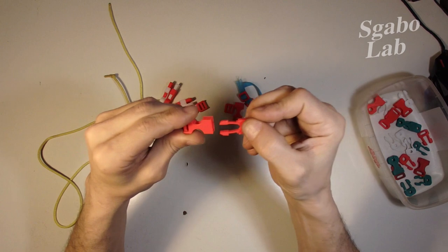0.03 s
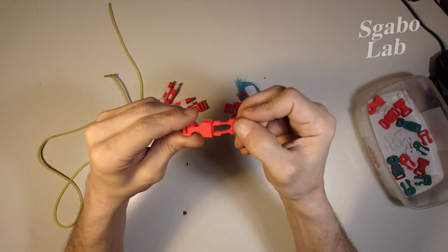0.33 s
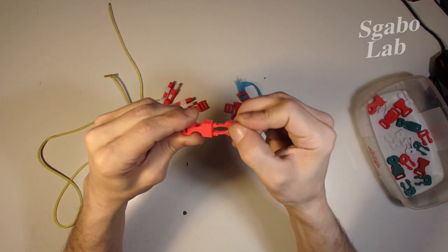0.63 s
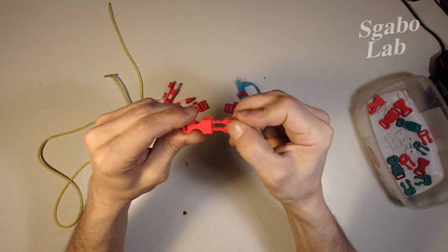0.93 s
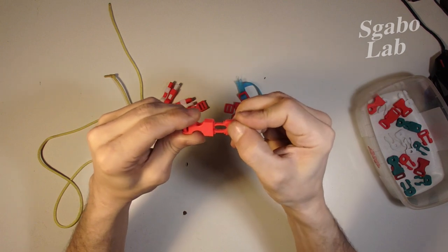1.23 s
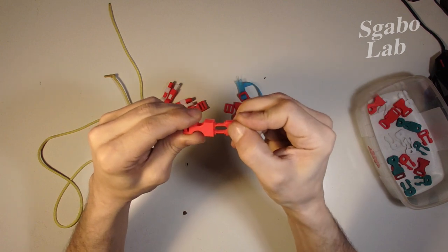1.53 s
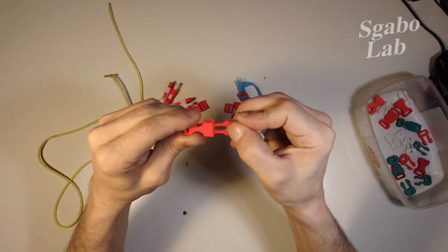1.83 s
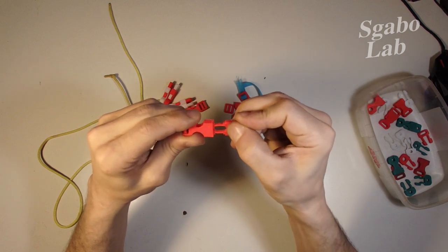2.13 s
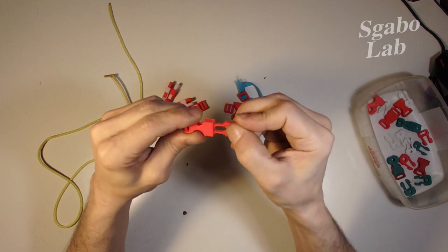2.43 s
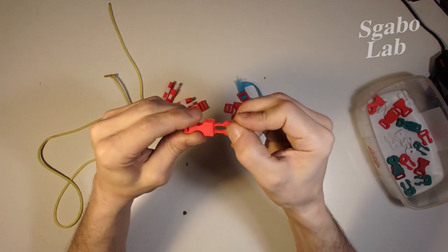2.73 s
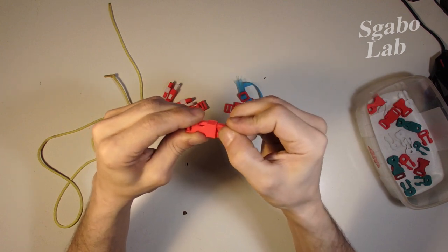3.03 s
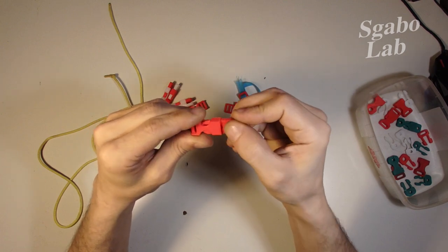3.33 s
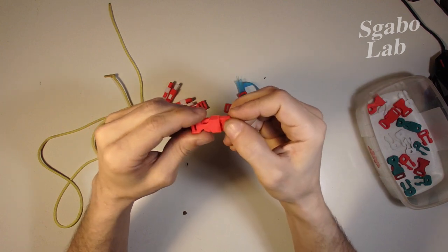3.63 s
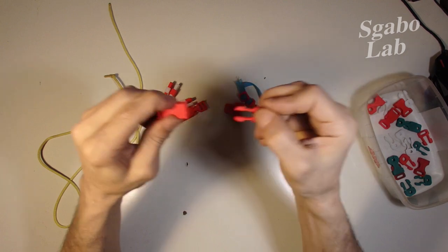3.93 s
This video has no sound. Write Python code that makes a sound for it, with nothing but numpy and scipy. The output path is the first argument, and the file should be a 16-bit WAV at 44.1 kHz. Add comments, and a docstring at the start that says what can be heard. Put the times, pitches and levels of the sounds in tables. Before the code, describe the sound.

A small plastic buckle is handled close by, giving a few light ticks between 0.3 and 0.7 seconds. At about 3 seconds the halves slide briefly and lock with one sharp snap and a hollow thump. Near 3.9 seconds come a quick cluster of ticks and a short scrape. A quiet fan with a faint high whine runs throughout in the small room, dipping just after the snap.

```python
"""A fan hums in a small room; a faint, fuzzy whine near 2.9 kHz runs throughout. Two halves of a small
plastic buckle are fitted together over a table: first come light ticks, impacts that ring body, shell
and prongs. Near 3 s the halves slide and the prongs lock with one sharp snap and a hollow thump; the
gain control ducks, then recovers. Last, the fingers shift with more ticks and a short friction scrape.
A dull copy runs just ahead of each click and scrape, and the room reverberates after it."""
import sys
import numpy as np
from scipy import signal
from scipy.fft import rfft, irfft, next_fast_len
from scipy.io import wavfile
from scipy.ndimage import uniform_filter1d, minimum_filter1d, map_coordinates

SR = 44100
rng = np.random.default_rng(int(sys.argv[2]) if len(sys.argv) > 2 else 0)


def wrap_up_sound(samples):
    """Save the sound to the file named by the first command line argument, as 16-bit audio."""
    columns = np.atleast_2d(samples).T
    # keep every value between -1 and 1, then stretch to whole-number steps
    tamed = np.clip(columns, -1, 1)
    steps = np.round(tamed * 32767).astype(np.int16)
    wavfile.write(sys.argv[1], SR, steps)


N = 176400


def amp(db):
    """Amplitude ratio of a level in decibels."""
    return 10 ** (np.asarray(db) / 20)


def unit(x):
    """Normalisation to an rms of 1."""
    return x / np.sqrt(np.mean(x ** 2) + 1e-20)


def along(points, hz):
    """Interpolation of (Hz, value) points on a logarithmic frequency axis."""
    f, v = np.transpose(points)
    return np.interp(np.log(hz + 1), np.log(f + 1), v)


def wobble(rate):
    """Random modulation: a smooth curve with rate knots a second."""
    knots = rng.standard_normal(int(N * rate / SR) + 4)
    return map_coordinates(knots, [np.arange(N) * rate / SR])


def filtered(x, response):
    """Linear filtering: the spectrum of x times a complex frequency response."""
    size = next_fast_len(N + SR // 2)
    return irfft(rfft(x, size) * response(np.fft.rfftfreq(size, 1 / SR)), size)[..., :N]


def stereo(mid, side):
    """Sum and difference of mid and side give left and right."""
    return np.array([mid + side, mid - side])


def impulse_response(resonances, pitch_ratio=1):
    """Minimum-phase ring of a resonance curve shifted by pitch_ratio, with unit energy."""
    hz = np.fft.rfftfreq(4096, 1 / SR)
    cepstrum = irfft(np.log(amp(along(resonances, hz / pitch_ratio))))
    half = len(cepstrum) // 2
    causal = np.concatenate([cepstrum[:1], 2 * cepstrum[1:half], np.zeros(half)])
    ring = irfft(np.exp(rfft(causal)))
    return ring / np.linalg.norm(ring)


# Spectrum of the fan's air noise. Each row: frequency in Hz, relative spectral density in dB.
AIR_SPECTRUM = [(20, -7), (60, -8), (110, -4.5), (190, 0), (250, -1.5), (380, 1), (540, -5.5), (720, -1),
                (1000, -4), (1250, -2.5), (1360, -10.5), (1480, -6.5), (1750, -9.5), (2100, -7.5),
                (2600, -9.5), (3100, -9), (3350, -11), (4400, -9.5), (4880, -4.5), (5400, -14),
                (6400, -14.5), (7500, -21), (9000, -24.5), (11800, -22), (13700, -22), (15000, -37)]
# Stereo width of that noise. Each row: frequency in Hz, side over mid in dB.
AIR_WIDTH = [(40, -1), (150, -4.5), (400, -8), (1200, -8), (1800, -11), (2600, -4), (3000, -7), (3800, 3.5),
             (5000, 0), (14000, -1)]
# Tones of the fan. Each row: frequency in Hz, level in dB.
FAN_TONES = [(287, -69), (360, -73.5), (453, -67.5), (703, -72.5)]

def fan(air_db=-51, air_waver_db=.38, hum_waver_db=2.3, drift_rad=1.1):
    """Broadband plus tonal noise: steady air and a hum that wavers in amplitude and phase."""
    def colour(hz):
        side = amp(along(AIR_WIDTH, hz))
        return amp(along(AIR_SPECTRUM, hz)) * np.array([np.ones_like(side), side]) / np.sqrt(1 + side ** 2)
    air = unit(stereo(*filtered(rng.standard_normal((2, N)), colour)))
    air *= amp(air_db + air_waver_db * wobble(5.99))
    t = np.arange(N) / SR
    hum = np.zeros(N)
    for hz, db in FAN_TONES:
        peak = np.sqrt(2) * amp(db + hum_waver_db * wobble(4.34))
        hum += peak * np.sin(2 * np.pi * hz * t + drift_rad * wobble(12))
    return air + hum


# Swells of the whine. Each row: time in seconds, level in dB.
WHINE_LEVELS = [(.1, -67), (.25, -63), (1.05, -63.5), (1.5, -66), (1.65, -62), (1.8, -65.5), (2.12, -66),
                (2.22, -62), (2.6, -65), (2.7, -61), (2.8, -67), (3.25, -62), (3.7, -65)]

def whine(centre_hz=2895, width_hz=205, line_hz=2916, spacing_hz=68, valley_db=-18, side_db=-9):
    """Narrow-band noise with a comb spectrum: fuzzy, evenly spaced lines that swell now and then."""
    def lines(hz):
        comb_db = valley_db * np.sin(np.pi * (hz - line_hz) / spacing_hz) ** 2
        return np.exp(-((hz - centre_hz) / width_hz) ** 2) * amp(comb_db)
    mid, side = filtered(rng.standard_normal((2, N)), lines)
    level_db = np.interp(np.arange(N) / SR, *np.transpose(WHINE_LEVELS))
    return amp(level_db) * unit(stereo(mid, amp(side_db) * side))


# Balance of the background. Each row: frequency in Hz, left over right in dB.
BALANCE = [(100, 0), (400, 0), (1500, 2), (2900, 1.5), (4000, -2), (4900, -5), (6500, -1), (14000, 1)]

def background():
    """Level difference between the channels: fan and whine lean left or right with frequency."""
    return filtered(fan() + whine(), lambda hz: amp(along(BALANCE, hz) * np.array([[.5], [-.5]])))


# Reverberation time of the room. Each row: frequency in Hz, time to fall 60 dB in seconds.
ROOM_T60 = [(150, 0.19), (1000, 0.23), (4000, 0.38), (11000, 0.31), (15000, 0.13)]
# Colour of the reflected sound. Each row: frequency in Hz, gain in dB.
ROOM_GAIN = [(100, -12), (900, -2), (2500, -2), (5000, -3.5), (8500, 1.5), (11000, -1.3), (14000, 11)]

def room(x, early_db=-6.5, early_t60_s=.043, side_db=-7):
    """Reverberation: early reflections from table and hands, then the diffuse tail of the walls."""
    hz, t, noise = signal.stft(rng.standard_normal((2, SR // 2)), SR, nperseg=256)
    decay = amp(-60 * t / along(ROOM_T60, hz)[:, None])
    tail = signal.istft(noise * decay, SR, nperseg=256)[1]
    t = np.arange(tail.shape[1]) / SR
    early = rng.standard_normal(tail.shape) * amp(-60 * t / early_t60_s) * (t > .001)
    response = tail / np.linalg.norm(tail[0]) + amp(early_db) * early / np.linalg.norm(early[0])
    reflected = signal.fftconvolve(x[None], response, axes=1)[:, :N]
    mid, side = filtered(reflected, lambda hz: amp(along(ROOM_GAIN, hz)))
    return stereo(mid, amp(side_db) * side)


# Pass band of the dull copy. Each row: frequency in Hz, gain in dB.
PRE_ECHO_BAND = [(300, -24), (700, -7), (1100, -2), (1500, 3), (2300, 5), (2950, 4.5), (3350, -26),
                 (5000, -60)]

def pre_echo(x, lead_s=.0158, smear_s=.0042):
    """Pre-echo: a muffled, smeared copy of x, moved earlier by a linear phase shift."""
    t = np.arange(SR // 50) / SR
    smear = rng.standard_normal(len(t)) * np.exp(-(t / smear_s) ** 4)
    blurred = signal.fftconvolve(x, smear / np.linalg.norm(smear))[:N]
    return filtered(blurred, lambda hz: amp(along(PRE_ECHO_BAND, hz)) * np.exp(2j * np.pi * hz * lead_s))


# Slides: first plastic on plastic, then fingers rubbing the plastic. Each row: peak time, rise and fall
# constants in seconds, level in dB.
SLIDES = [(2.968, 0.01, 0.022, -53.5), (3.954, .012, 0.021, -48)]
# Spectrum of the friction. Each row: frequency in Hz, relative level in dB.
FRICTION_SPECTRUM = [(100, 4), (800, -1), (1600, -6), (2900, -3), (4000, -7), (4600, 0), (5700, 1),
                     (6800, -4), (8500, -8), (10800, -4), (12500, -17), (14500, -36)]

def scrape(grain_db=4.1, grains_per_s=500):
    """Sliding friction: grainy noise that swells and dies exponentially with each stroke."""
    t = np.arange(N) / SR
    strokes = sum(amp(db) * np.exp(-np.maximum((peak - t) / rise, (t - peak) / fall))
                  for peak, rise, fall, db in SLIDES)
    grains = rng.standard_normal(N) * amp(grain_db * wobble(grains_per_s))
    return strokes * unit(filtered(grains, lambda hz: amp(along(FRICTION_SPECTRUM, hz))))


# Spectrum of the seating thump. Each row: frequency in Hz, relative level in dB.
THUMP_SPECTRUM = [(140, 0), (220, -3), (470, -9.5), (770, -6.5), (1100, -10), (1600, -15), (2100, -12),
                  (2700, -23), (3500, -35), (8000, -55)]

def seating_thump(start_s=2.9998, gain_db=-1.8, pan_db=3):
    """Impulse excitation: one solid, hollow thump, right of centre, as the halves seat."""
    thump = impulse_response(THUMP_SPECTRUM)
    track = np.zeros(N)
    track[round(start_s * SR):][:len(thump)] = thump
    return amp(gain_db) * track * amp([[-pan_db], [pan_db]])


# Broad, well damped resonances of the hollow body, its thin shell and the springy prongs.
# Each row: frequency in Hz, relative level in dB.
BODY_RESONANCES = [(150, -22), (500, -9), (770, 8), (900, 3), (1100, 6), (1550, -5), (2150, 1), (2550, -5),
                   (2900, -1), (3250, -16), (7600, -35)]
SHELL_RESONANCES = [(950, -27), (2400, -15), (2900, 1), (3800, -1), (4500, 3), (5500, 2.5), (6300, 0),
                    (7200, -2), (8000, -9), (9400, -10), (12100, -14), (14000, -30)]
PRONG_RESONANCES = [(2000, -39), (5400, -28), (7400, -20), (8200, -24), (9300, -21), (10200, -7),
                    (10700, 0), (11200, 1), (11700, -4), (12100, -11), (12500, -11), (13000, -21),
                    (14200, -35), (15000, -64)]
# Contacts of the halves. Each row: start in seconds, body, shell and prong levels in dB,
# prong pitch in Hz (it depends on the grip), chatter's share of the force's energy from 0 to 1.
CONTACTS = [(.3545, -52, -32, -29, 10750, .3), (.3695, -50, -31, -31, 10750, .5),
            (.5311, -37, -22, -32, 10600, .25), (.728, -56, -41, -35, 10900, .4),
            (2.9565, -22, -34, -37, 11300, .4), (2.9628, -33, -30, -42, 11000, .8),
            (2.9998, -13.5, -17, 0, 11050, .85), (3.3995, -60, -56, -45, 11300, .36),
            (3.830, -48, -36, -50, 11000, .6), (3.9403, -30, -27.5, -60, 10500, .25),
            (3.9442, -29, -22.5, -50, 10500, .35), (3.9463, -40, -28, -52, 10500, .3),
            (3.9515, -30, -23.5, -33, 10300, .6), (3.9533, -30, -23, -38, 10400, .5),
            (3.9556, -35, -24, -34, 10600, .6)]

def buckle(nominal_prong_hz=11100, chatter_t60_s=.012):
    """Impacts excite damped resonances. Returns the direct clicks and chatter-free blows for the room."""
    direct, blows = np.zeros((2, N + SR))
    body, shell = impulse_response(BODY_RESONANCES), impulse_response(SHELL_RESONANCES)
    t = np.arange(SR // 30) / SR
    for start_s, body_db, shell_db, prong_db, prong_hz, chatter in CONTACTS:
        # shell and prongs are driven by one impulse and a brief flurry of tiny slips
        slips = rng.standard_normal(len(t)) * amp(-60 * t / chatter_t60_s)
        force = np.sqrt(chatter) * slips / np.linalg.norm(slips)
        force[0] = np.sqrt(1 - chatter)
        prongs = impulse_response(PRONG_RESONANCES, prong_hz / nominal_prong_hz)
        ring = amp(shell_db) * shell + amp(prong_db) * prongs
        knock = amp(body_db) * body
        click = signal.fftconvolve(force, ring)
        click[:len(knock)] += knock
        start = round(start_s * SR)
        direct[start:][:len(click)] += click
        blows[start:][:len(knock)] += knock + ring
    return direct[:N], blows[:N]


def scene():
    """Superposition: the humming background, the room's reflections and the buckle close by."""
    clicks, blows = buckle()
    slides = scrape()
    direct = clicks + slides
    return background() + room(blows + slides) + pre_echo(direct) + seating_thump() + direct


def record(dry, limit_db=-12.5, hold_s=.14, release_db_per_s=8, start_duck_db=3.5, top_hz=14970):
    """Automatic gain control: it ducks at a peak, holds and recovers slowly; a low-pass follows."""
    peak_db = 20 * np.log10(np.abs(dry).max(axis=0) + 1e-9)
    over_db = np.maximum(peak_db - limit_db, 0)
    hold = 2 * int(hold_s * SR / 2) + 1
    held_db = -minimum_filter1d(-over_db, hold, origin=hold // 2)  # largest excess in the last hold_s
    recovery_db = release_db_per_s * np.arange(N) / SR
    duck_db = np.maximum(np.maximum.accumulate(held_db + recovery_db), start_duck_db) - recovery_db
    gain = amp(-uniform_filter1d(duck_db, size=16))
    return filtered(dry * gain, lambda hz: hz < top_hz)


dry = scene()
out = record(dry)
wrap_up_sound(out)
```